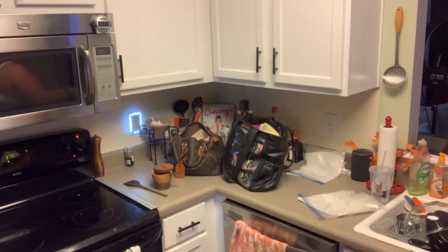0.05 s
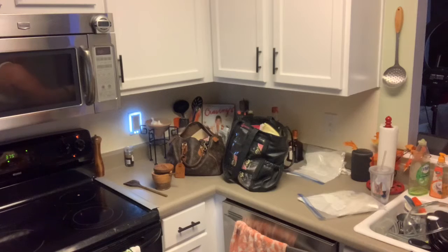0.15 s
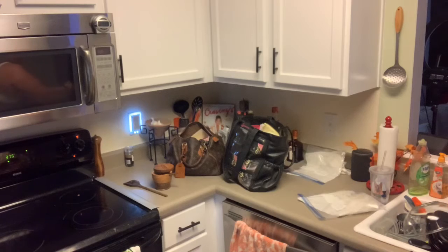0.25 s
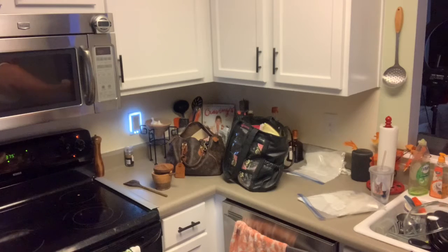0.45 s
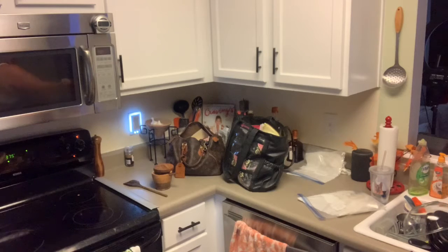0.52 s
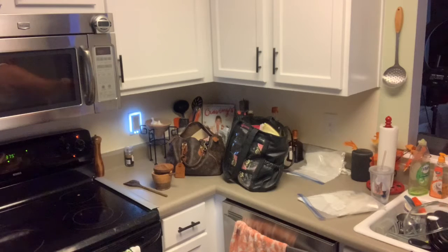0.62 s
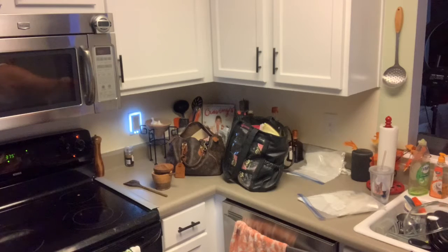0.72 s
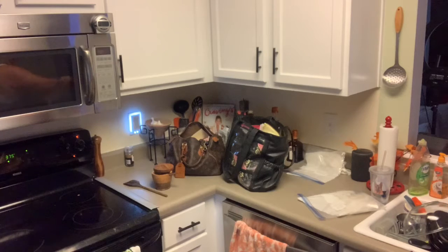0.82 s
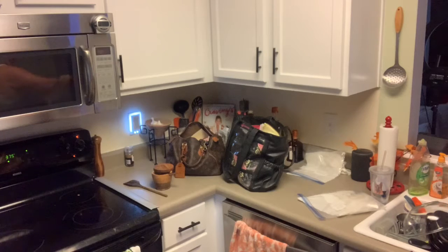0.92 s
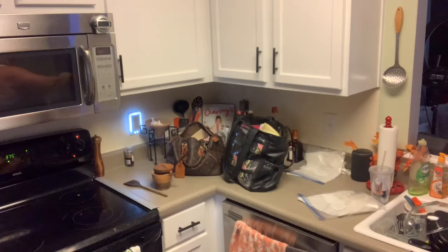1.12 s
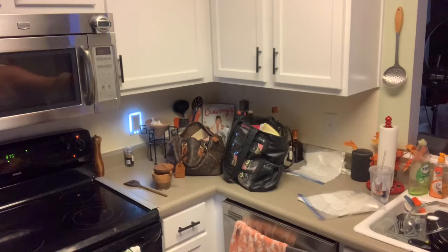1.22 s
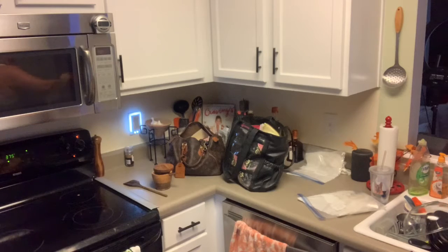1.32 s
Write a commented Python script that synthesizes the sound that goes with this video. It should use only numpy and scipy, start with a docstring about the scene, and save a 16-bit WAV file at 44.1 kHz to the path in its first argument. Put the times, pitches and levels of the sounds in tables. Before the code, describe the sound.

Metal pan clanking twice in a sink, the second louder, followed by faint taps.

```python
"""A metal pan handled over a kitchen sink in a small hard room, heard mostly to the left in stereo.
One clank is already dying away when a louder one lands as a quick chatter of contacts. The pan's
modes ring on over the dense clatter of thin steel and the hollow thud of the basin, until a touch
mutes them; light taps and nudges follow. The room answers the clatter and the taps, and an
appliance hums under a low rumble."""
import sys
import numpy as np
from scipy import signal
from scipy.fft import rfft, irfft, next_fast_len
from scipy.io import wavfile
from scipy.ndimage import map_coordinates

SR = 44100
rng = np.random.default_rng(int(sys.argv[2]) if len(sys.argv) > 2 else 0)


def store_pcm(level_fs):
    """Save levels as 16-bit WAV."""
    pcm = np.round(np.clip(level_fs, -1, 1) * 32767).astype(np.int16)
    wavfile.write(sys.argv[1], SR, np.atleast_2d(pcm).T)


N = 59535
TIME = np.arange(N) / SR


def amp(db):
    return 10 ** (np.asarray(db) / 20)


def along(points, hz):
    """Read (Hz, value) points on a log frequency axis."""
    freqs, values = np.transpose(points)
    return np.interp(np.log(hz + 1), np.log(freqs + 1), values)


def fade(t, t60):
    """Exponential decay from t = 0, silence before."""
    return (t >= 0) * amp(-60 * np.maximum(t, 0) / t60)


def wobble(position):
    """A smooth random curve with one knot per unit of position."""
    return map_coordinates(rng.standard_normal(1024), [position], mode="wrap")


def filtered(x, response):
    """Pass x through a complex response of frequency."""
    size = next_fast_len(N + SR // 2)
    return irfft(rfft(x, size) * response(np.fft.rfftfreq(size, 1 / SR)), size)[..., :N]


def causal(gain):
    """The minimum-phase response with this gain: nothing sounds before its cause."""
    cepstrum = irfft(np.log(np.maximum(gain, 1e-6)))
    half = len(cepstrum) // 2
    cepstrum[1:half] *= 2
    cepstrum[half + 1:] = 0
    return np.exp(rfft(cepstrum))


def noise(colour, likeness, envelope=lambda white: white):
    """Stereo noise with a given colour and left-right likeness; rms 1 where the envelope is 1."""
    def response(hz):
        gain = colour(hz)
        gain = gain / np.sqrt(np.mean(gain ** 2) + 1e-20)
        spread = np.arccos(np.clip(along(likeness, hz), -1, 1)) / 2
        return causal(gain) * np.array([np.cos(spread), np.sin(spread)])
    mid, side = filtered(envelope(rng.standard_normal((2, N))), response)
    return np.array([mid + side, mid - side])


# The kitchen's reverberation. Each row: frequency in Hz, t60 in seconds.
KITCHEN_DECAY = [(250, 0.12), (1000, 0.55), (3000, 0.47), (6500, 0.41), (13000, 0.15)]
# Stereo width of the clatter and taps: wide in the middle, narrow in the high treble.
# Each row: frequency in Hz, left-right likeness from 0 to 1.
PAN_LIKENESS = [(300, 0.52), (1000, 0.36), (2500, 0.19), (5000, 0.22), (7000, 0.72), (8300, 1),
                (14000, .96)]


def burst(blows, colour, t60, rise_s=.00039, room_db=1.5, room_rise_s=.004):
    """Noisy blows (seconds, dB) dying in t60, each followed by the kitchen's diffuse answer."""
    def envelope(white):
        hz, t, spectrum = signal.stft(white, SR, nperseg=64)
        room_t60 = np.maximum(along(KITCHEN_DECAY, hz), .05)[:, None]
        room_gain = amp(room_db) ** 2 * t60 / room_t60
        power = 0
        for start, db in blows:
            age = np.maximum(t - start, 0)
            direct = fade(t - start, t60) ** 2
            build_up = 1 - direct * np.exp(-age / room_rise_s)
            room = room_gain * build_up * fade(t - start, room_t60) ** 2
            power += amp(db) ** 2 * (1 - np.exp(-age / rise_s)) * (direct + room)
        return signal.istft(spectrum * np.sqrt(abs(power)), SR, nperseg=64)[1][:, :N]
    return noise(colour, PAN_LIKENESS, envelope)


def ring(start, modes, attack_s=.0028, beat_depth=.3, beat_hz=40):
    """Struck modes (Hz, dB, t60 in seconds); reflections make each one beat at random."""
    t, ringing = TIME - start, np.zeros(N)
    for hz, db, t60 in modes:
        beating = 1 + beat_depth * (wobble(TIME * beat_hz) + 1j * wobble(TIME * beat_hz))
        tone = np.exp(2j * np.pi * (hz * t + rng.random()))
        ringing += amp(db) * fade(t, t60) * np.real(beating * tone)
    return ringing * (1 - np.exp(-np.maximum(t, 0) / attack_s))


CLATTER_DB, CLATTER_T60_S = -25.5, .05
GRIPPED = .7  # share of the ring time left while the pan is gripped
# The pan's modes. Each row: frequency in Hz, level in the main clank in dB,
# relative level in the early clank in dB, free t60 in seconds.
PAN_MODES = [(684, -27, -33, .66), (765, -37, -58, .42), (845, -37, -60, .36), (1042, -31, -25, .54),
             (1075, -41, -50, .75), (1197, -38, -56, .4), (1538, -28, -37, .56), (1943, -44, -37, .42),
             (2312, -41, -58, .35), (2597, -52, -35, .45), (3115, -40, -60, .35), (3182, -42, -60, .35),
             (4108, -37, -62, .3), (4440, -52, -41, .48), (4530, -41, -62, .37), (5165, -39, -60, .35),
             (5345, -50, -44, .4), (5902, -41, -62, .35), (6735, -44, -60, .34)]
# The dense clatter of thin steel. Each row: frequency in Hz, relative spectral level in dB.
CLATTER_SPECTRUM = [(120, -47.5), (190, -26), (240, -5), (330, -12), (430, -21.5), (600, -4), (830, 2.5),
                    (940, -7), (1120, 3.5), (1400, -8), (1560, 3.5), (1880, -10.5), (2200, -4.5),
                    (2600, -15), (3000, -9.5), (3700, -12), (4150, -12), (5000, -13), (6800, -12.5),
                    (7900, -26.5), (8700, -21), (9900, -27), (10500, -31.5), (11700, -34.5), (13400, -24.5),
                    (14600, -33)]


def early_clank(start=-.049, ring_db=-7, softer_db=-9, dull_hz=7000):
    """A lighter, duller clank: struck at another spot, the same modes ring with other strengths."""
    def dull_steel(hz):
        return amp(along(CLATTER_SPECTRUM, hz)) / (1 + (hz / dull_hz) ** 10)
    modes = [(hz, db, t60 * GRIPPED) for hz, _, db, t60 in PAN_MODES]
    clatter = burst([(start, CLATTER_DB + softer_db)], dull_steel, CLATTER_T60_S)
    return amp(ring_db) * ring(start, modes) + clatter


# Room tone. Each row: frequency in Hz, relative spectral level in dB.
AIR_SPECTRUM = [(20, -35.5), (45, -8), (110, -8.5), (185, -15.5), (260, -4.5), (330, -9.5), (480, -15.5),
                (620, -26.5), (1000, -33), (2000, -34), (2600, -38.5), (5000, -43), (6800, -38.5),
                (7800, -46), (9500, -42.5), (10400, -48), (13200, -48), (14800, -53.5)]
# Its rise and fall. Each row: time in seconds, level in dB.
AIR_LEVEL = [(0, -50.5), (.1, -57.5), (.5, -62), (.75, -61.5), (.95, -64), (1.05, -61.5), (1.2, -64),
             (1.35, -65)]
# Its stereo width. Each row: frequency in Hz, left-right likeness from 0 to 1.
AIR_LIKENESS = [(50, 1), (150, 0.3), (400, 0.3), (2000, 0.17), (6000, 0.28), (8300, 1), (13000, 0.73)]
# The drone's swell. Each row: time in seconds, rms level in dB.
DRONE_LEVEL = [(0, -98), (.5, -70), (.62, -62.5), (.95, -59), (1.1, -67), (1.35, -74)]
# The background leans left. Each row: frequency in Hz, left minus right in dB.
BACKGROUND_SIDE = [(50, 13), (150, 4), (300, 1), (700, 1), (1500, 9), (7000, 0.5)]


def background(mains_hz=59.6, mains_db=-67, drone_hz=148.9):
    """The kitchen's room tone: low rumble, faint hiss, mains hum and a drone that swells and fades."""
    def level(points):
        return amp(np.interp(TIME, *np.transpose(points)))
    air = level(AIR_LEVEL) * noise(lambda hz: amp(along(AIR_SPECTRUM, hz)), AIR_LIKENESS)
    mains = amp(mains_db) * np.sin(2 * np.pi * mains_hz * TIME)
    drone = level(DRONE_LEVEL) * np.sin(2 * np.pi * drone_hz * TIME)
    return placed(air + np.sqrt(2) * (mains + drone), BACKGROUND_SIDE)


def ripple(hz, spacing_hz=55):
    """Random peaks and dips of crowded small resonances."""
    return wobble(hz / spacing_hz)


def steel(hz, cluster_db=7, cluster_width_hz=70, ripple_db=1.8, treble_hz=2000):
    """Clatter colour: small resonances ripple the treble and bunch around the strong upper modes."""
    strong_modes = [centre for centre, db, _, _ in PAN_MODES if centre > 3000 and db > -46]
    clusters = np.max([np.exp(-((hz - centre) / cluster_width_hz) ** 2) for centre in strong_modes], 0)
    treble_ripple = ripple(hz) * np.minimum(hz / treble_hz, 1) ** 2
    return amp(along(CLATTER_SPECTRUM, hz) + cluster_db * clusters + ripple_db * treble_ripple)


# The pan meets the sink. Each row: start in seconds, relative level in dB.
CONTACTS = [(.2042, -7), (.2068, 2), (.2098, 3), (.2215, 0), (.2395, -7), (.244, -8.5), (.265, -12.5)]
# The basin's hollow thud. Each row: frequency in Hz, level in dB, t60 in seconds.
BASIN_MODES = [(231, -46, 0.39), (295.6, -50, 0.82), (319.6, -41.5, .28), (341, -46.5, 0.79),
               (543.6, -55.5, 1)]


def main_clank(mute_at_s=.40, mute_over_s=.028, mute_db=-9.5):
    """The pan chatters against the basin and rings until a touch mutes it."""
    start = CONTACTS[0][0]
    muting = amp(mute_db * np.clip((TIME - mute_at_s) / mute_over_s, 0, 1))
    pan = muting * ring(start, [(hz, db, t60) for hz, db, _, t60 in PAN_MODES])
    basin = ring(start, BASIN_MODES)
    clatter = amp(CLATTER_DB) * burst(CONTACTS, steel, CLATTER_T60_S)
    return pan + basin + clatter


# Light touches at the sink. Each row: start in seconds, level in dB, band centre in Hz,
# half-width in octaves, t60 in seconds.
TOUCHES = [(.42, -64.5, 9150, 0.1, 0.15), (.42, -77, 13100, 0.17, 0.3), (0.457, -56.5, 930, 0.59, 0.42),
           (0.439, -61, 5130, 0.48, 0.49), (0.538, -69.5, 6500, 0.14, 0.6), (.645, -59, 3580, 0.83, 0.076),
           (.662, -55, 2500, 0.72, 0.055), (0.75, -51.5, 1315, 0.54, 0.073),
           (0.776, -75.5, 6270, 0.2, 0.89), (0.808, -75.5, 3360, 0.17, 0.21),
           (0.918, -77, 1540, 0.29, 0.13), (1.208, -74, 1520, 0.28, 0.06)]


def touches(ripple_db=2.5):
    """Light scuffs and taps as the pan settles, each a noise burst in its own band."""
    def band(centre, width):
        return lambda hz: amp(ripple_db * ripple(hz)) / (1 + (np.log2((hz + 1) / centre) / width) ** 4)
    return sum(burst([(start, db)], band(centre, width), t60, rise_s=.0057, room_db=-2.5)
               for start, db, centre, width, t60 in TOUCHES)


# Soft nudges to the pan. Each row: start in seconds, level in dB relative to the main clank's ring.
NUDGES = [(.452, -24.5), (.53, -28)]


def nudges(top_hz=1700):
    """Soft nudges wake only the low modes of the gripped pan."""
    low_modes = [(hz, db, t60 * GRIPPED) for hz, db, _, t60 in PAN_MODES if hz < top_hz]
    return sum(amp(db) * ring(start, low_modes) for start, db in NUDGES)


# Left-right phase of the stereo image. Each row: frequency in Hz, lead of the left in radians.
STEREO_PHASE = [(50, -1.7), (150, -2.2), (300, -1.2), (450, 0), (600, 1.4), (700, 2.4), (800, 3.9),
                (1650, 5.8), (2200, 8.6), (2800, 8.8), (3300, 6.3), (4400, 5.9), (5200, 4.1), (6200, 4.2),
                (7900, 3.15), (8800, 3.1), (10500, 1.5), (12000, .1), (13500, -.1), (14800, -2)]


def placed(x, side):
    """Place the sound with level (side: Hz, dB) and phase differences between the channels."""
    def response(hz):
        left = amp(along(side, hz) / 2)
        right = np.exp(-1j * along(STEREO_PHASE, hz)) / left
        pair = np.array([left, right])
        return pair / np.sqrt(np.mean(abs(pair) ** 2, axis=0))
    return filtered(x, response)


# The pan's stereo balance: to the left in the middle range, centred in the high treble.
# Each row: frequency in Hz, left minus right in dB.
PAN_SIDE = [(250, 0), (500, 2), (700, 3), (900, 6), (1100, 12), (2500, 12), (4500, 8), (6000, 5), (7000, 0),
            (14000, 0)]


def scene():
    """The pan at the sink, off to the left, over the kitchen's background."""
    pan = early_clank() + main_clank() + touches() + nudges()
    return placed(pan, PAN_SIDE) + background()


def record(dry):
    """The recorder keeps nothing above 15 kHz."""
    return filtered(dry, lambda hz: hz < 15000)


dry = scene()
out = record(dry)
store_pcm(out)
```